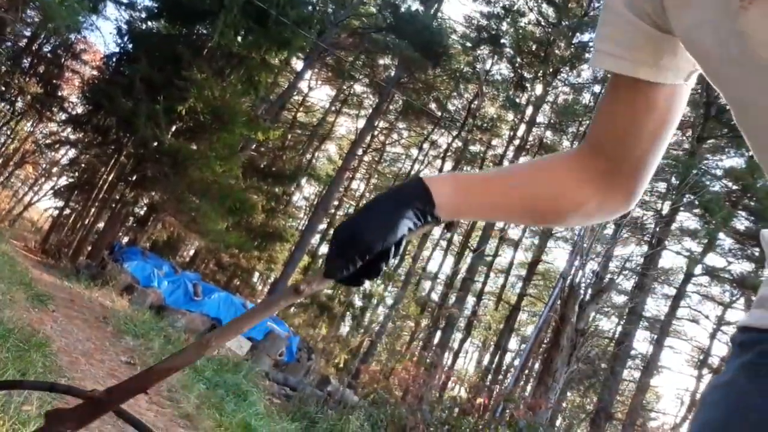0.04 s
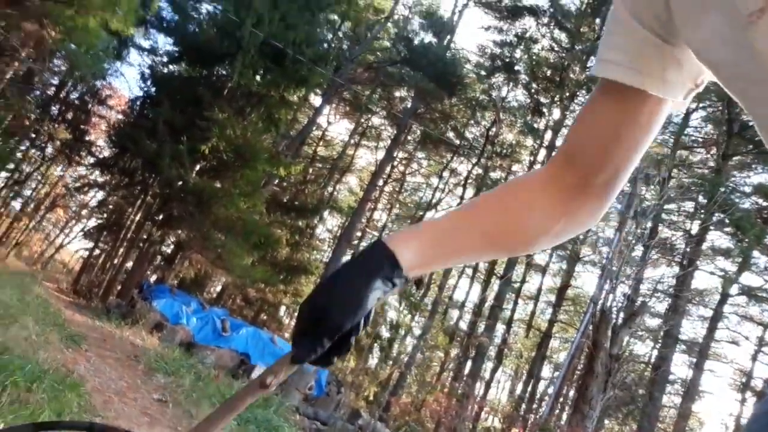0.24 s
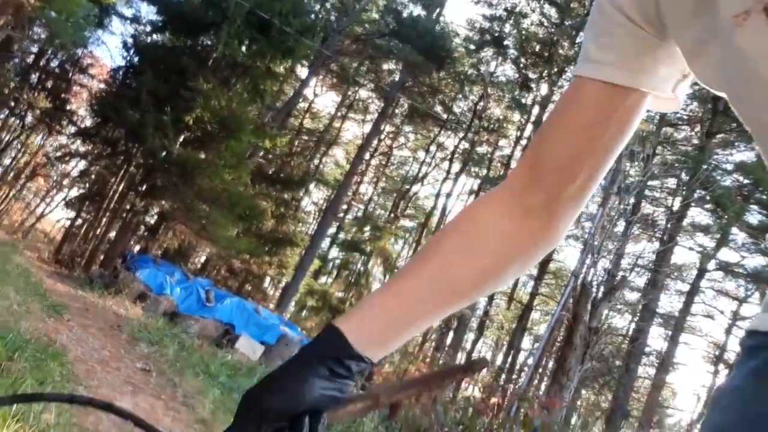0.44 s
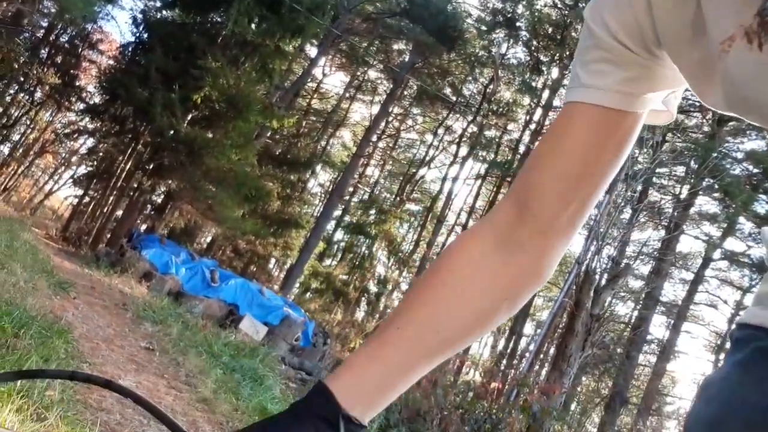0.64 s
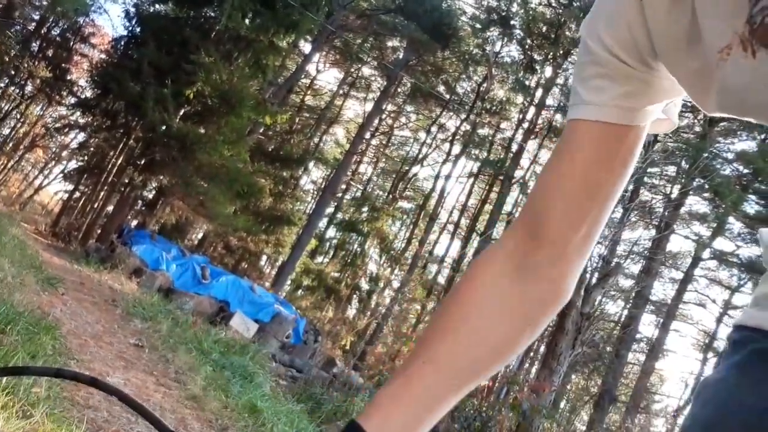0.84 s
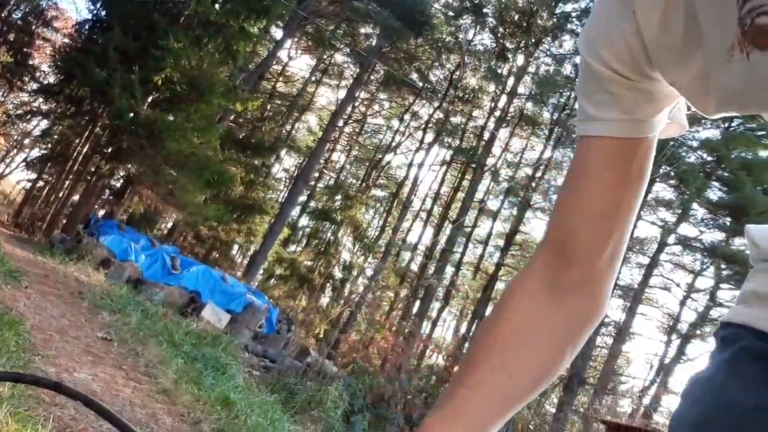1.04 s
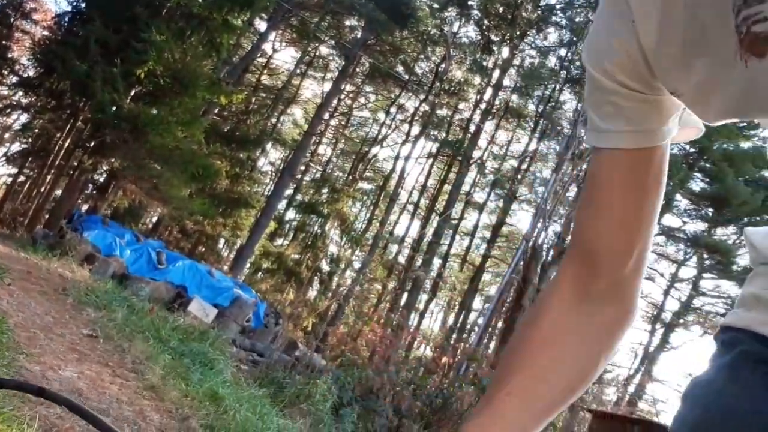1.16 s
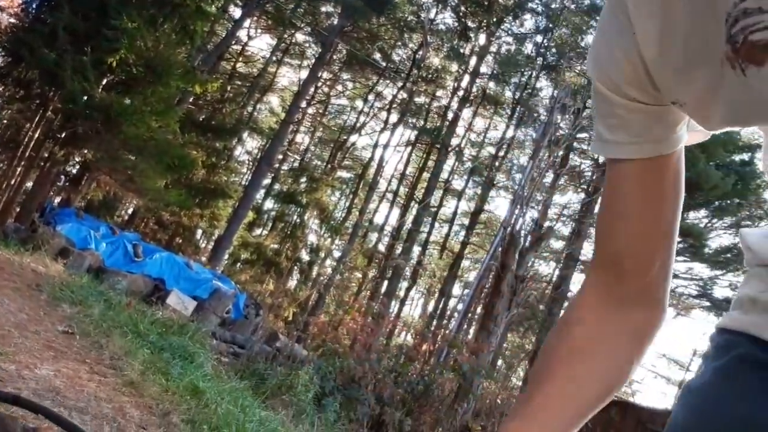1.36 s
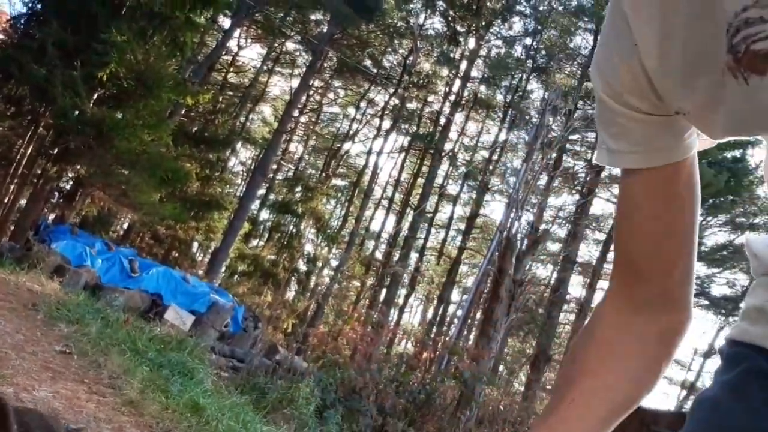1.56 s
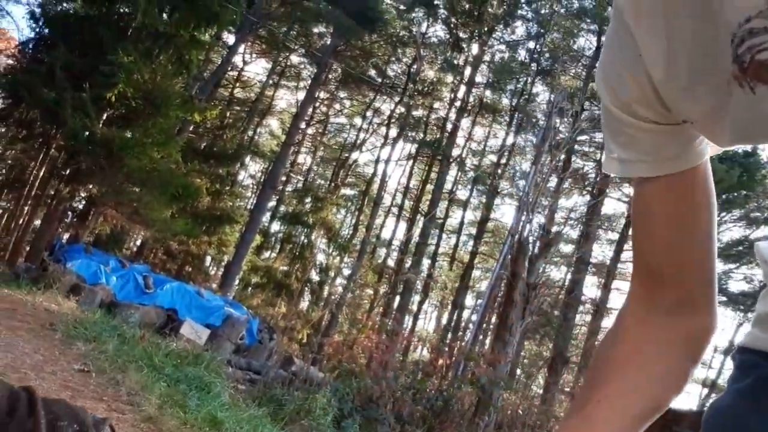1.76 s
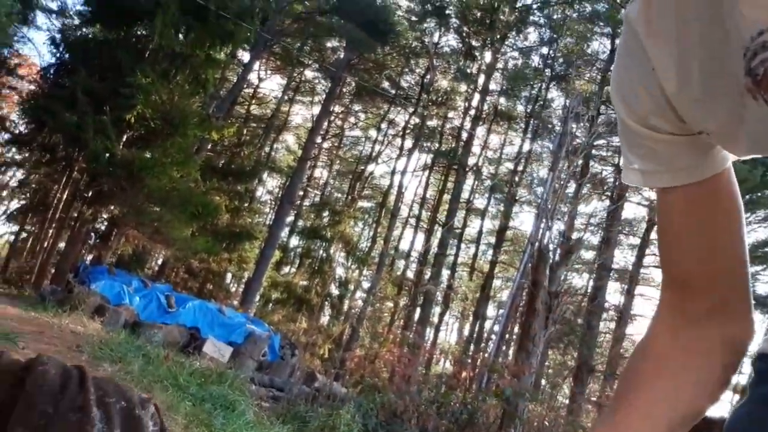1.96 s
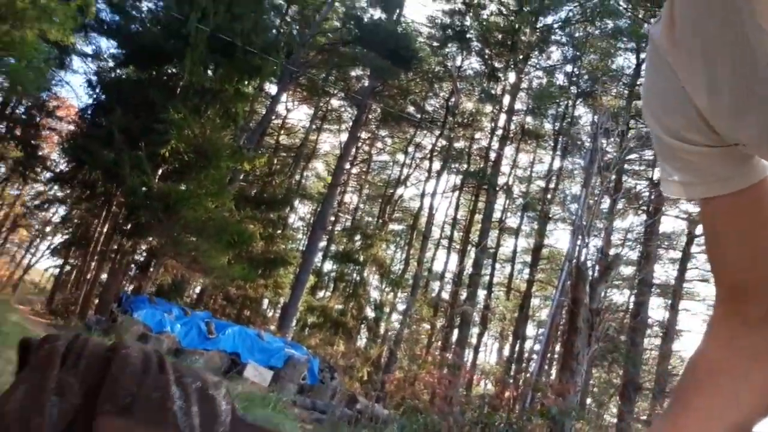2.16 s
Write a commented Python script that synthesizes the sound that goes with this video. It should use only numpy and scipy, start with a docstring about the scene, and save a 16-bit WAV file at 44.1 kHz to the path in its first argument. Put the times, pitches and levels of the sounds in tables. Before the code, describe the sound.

Drips patter into a pot from soaked fabric, with dull thumps and wind on the microphone.

```python
"""A dull bump and the hollow swish of a stick along a dye pot, as soaked fabric is worked and lifted out.
Drops ping on the liquid and excite the pot's modes; the wet cloth slumps and sloshes, and runoff fizzes.
Low thumps and turbulent puffs of air reach the microphone. Behind them, at the edge of a wood,
far insects trill and a bird whistles thinly over a quiet hush."""
import sys
import numpy as np
from scipy import signal
from scipy.fft import rfft, irfft
from scipy.io import wavfile
from scipy.ndimage import uniform_filter1d

SR = 44100
rng = np.random.default_rng(int(sys.argv[2]) if len(sys.argv) > 2 else 0)


def dump(signal):
    """Clip the signal to [-1, 1] and save it as 16-bit WAV at the path in sys.argv[1]."""
    limited = np.clip(np.atleast_2d(signal).T, -1, 1)
    pcm = np.round(limited * 32767).astype(np.int16)
    wavfile.write(sys.argv[1], SR, pcm)


N = 96755
T = np.arange(N) / SR

# Spectrum of water draining from cloth. Each row: frequency in Hz, relative density in dB.
WATER_SPECTRUM = [(300, -8.5), (600, 1), (1200, -9), (1700, -1.5), (2450, 5.5), (3200, -1.5), (4200, 3),
                  (6500, -5), (9000, -2.5), (12000, -1.5), (16000, -12.5)]


def from_db(db):
    """Amplitude grows tenfold for every 20 dB."""
    return 10 ** (np.asarray(db) / 20)


def rms_one(x):
    """Division by the RMS value gives unit power."""
    return x / np.sqrt(np.mean(x ** 2) + 1e-20)


def level(rows):
    """A gain envelope, linear in dB between points of time and level."""
    return from_db(np.interp(T, *np.transpose(rows)))


def coloured(x, spectrum):
    """Filtering by multiplication of spectra, scaled to unit power."""
    hz, db = np.transpose(spectrum)
    f = np.maximum(np.fft.rfftfreq(N, 1 / SR), 1)
    gain = from_db(np.interp(np.log(f), np.log(hz), db))
    return rms_one(irfft(rfft(x) * gain, N))


def noise(spectrum):
    """White noise takes on the spectrum of its filter; unit power."""
    return coloured(rng.standard_normal(N), spectrum)


def wander(rate):
    """Noise low-passed at the rate in Hz is a random drift of unit spread."""
    return noise([(1, 0), (rate, 0), (4 * rate, -40), (40 * rate, -120)])


def resonant_noise(hz, q):
    """Two passes through one resonance select a band of noise; unit power."""
    b, a = signal.iirpeak(min(hz, SR / 3), max(q, .5), fs=SR)
    return rms_one(signal.lfilter(b, a, signal.lfilter(b, a, rng.standard_normal(N))))


def evened(x, size):
    """Division by the running RMS over size samples holds the power steady."""
    return x / np.sqrt(uniform_filter1d(x ** 2, size=size) + 1e-9)


def since(onset):
    """Seconds elapsed since an onset, zero before it."""
    return np.maximum(T - onset, 0)


def dying(onset, t60):
    """Exponential decay from a sudden onset, by 60 dB in t60 seconds."""
    return (T >= onset) * np.exp(-np.minimum(np.log(1000) * since(onset) / t60, 50))


def swell(t, rise):
    """A critically damped pulse, peaking at 1 at the rise time."""
    u = np.minimum(t / rise, 50)
    return u * np.exp(1 - u)


def hush():
    """Stationary broadband noise, strongest in the bass, forms the outdoor background."""
    # Spectrum of the hush. Each row: frequency in Hz, relative density in dB.
    spectrum = [(25, 1), (60, 21), (130, 8), (200, 9.5), (300, -6), (500, -7.5), (800, -11.5), (1400, -13),
                (2200, -10.5), (3100, -27.5), (4500, -10), (6200, -10.5), (9200, -14), (12000, -13),
                (16000, -13.5)]
    return from_db(-65.5) * noise(spectrum)


def insect_chorus():
    """Amplitude modulation of narrow noise bands is heard as the throb of far insects."""
    # Insect bands. Each row: centre in Hz, quality factor, level in dB, throbs per second.
    bands = [(3956, 8.7, -76.5, 44), (7590, 19, -80.5, 32), (8960, 8, -78, 32)]
    out = np.zeros(N)
    for hz, q, db, throb_hz in bands:
        throb = 1 + 0.63 * np.sin(2 * np.pi * throb_hz * T + wander(rate=2.8))
        out += from_db(db) * throb * resonant_noise(hz, q)
    return out


def bird():
    """A far bird's whistle is a pure tone gliding in frequency, here along a parabola."""
    # Whistles. Each row: start and length in seconds, level in dB, first, middle and last pitch in Hz.
    whistles = [(.14, 0.077, -71, 7600, 8100, 8300), (1.617, 0.13, -69.5, 8160, 8380, 7400)]
    out = np.zeros(N)
    for onset, length, db, *pitches in whistles:
        progress = np.minimum(since(onset) / length, 1)
        hz = np.polyval(np.polyfit([0, .5, 1], pitches, deg=2), progress)
        out += from_db(db) * np.sin(np.pi * progress) * np.sin(2 * np.pi * np.cumsum(hz) / SR)
    return out


def insect_trill():
    """A nearly periodic train of falling chirps fuses into a trill."""
    # Envelope of the trill. Each row: time in seconds, level in dB.
    envelope = [(.55, -65.5), (.7, -60), (.85, -65), (1.1, -77.5), (1.6, -96), (1.95, -70), (2.19, -59.5)]
    chirps_per_s, jitter, duty = 44, .05, 0.49
    top_hz, fall_hz, waver_hz, waver_db = 4326, 802, 80, 1.2
    cycles = np.cumsum(chirps_per_s * (1 + jitter * wander(rate=8))) / SR
    progress = np.minimum(cycles % 1 / duty, 1)
    hz = top_hz - fall_hz * progress + waver_hz * wander(rate=28)
    chirps = np.sin(np.pi * progress) * np.sin(2 * np.pi * np.cumsum(hz) / SR)
    return level(envelope) * chirps * from_db(waver_db * wander(rate=16))


def buffeting():
    """Turbulent pressure on the microphone port rumbles; harder puffs reach higher in frequency."""
    # Envelope of the puffs. Each row: time in seconds, level in dB.
    envelope = [(0, -47.5), (.02, -48), (.04, -59), (.12, -62.5), (.3, -55.5), (.41, -56.5), (.437, -48),
                (.48, -60.5), (.57, -61), (.595, -61), (.612, -36), (.635, -45.5), (.655, -42.5),
                (.68, -33.5), (.697, -30.5), (.72, -40.5), (.74, -33), (.78, -39), (.795, -58),
                (.815, -45.5), (.88, -59), (.96, -58.5), (.985, -51.5), (1.03, -62.5), (1.65, -59.5),
                (1.95, -59.5), (1.98, -45), (2.015, -50.5), (2.05, -50.5), (2.1, -60.5), (2.16, -44.5),
                (2.19, -43)]
    # Spectrum of the turbulence. Each row: frequency in Hz, relative density in dB.
    spectrum = [(20, -68), (40, -2.5), (60, 7.5), (125, 2), (180, -8), (260, -20.5), (400, -25.5),
                (800, -50)]
    strong_puff_db, edge_db, edge_exponent = -22, -36.5, 1.426
    force = level(envelope)
    low_pass = signal.butter(4, 376, "low", fs=SR, output="sos")
    rumble = signal.sosfilt(low_pass, evened(noise(spectrum), size=900))
    edge_gain = from_db(edge_db) * (force / from_db(strong_puff_db)) ** edge_exponent
    return force * rumble + edge_gain * evened(resonant_noise(hz=185, q=1.97), size=900)


def thumps():
    """A heavily damped low oscillation, sagging in pitch, is heard as a dull thump."""
    # Thumps. Each row: start in seconds, peak in dB, first and final pitch in Hz, rise in seconds.
    pulses = [(.001, -33, 71.5, 62.6, 0.0088), (.2156, -16, 298, 71.5, 0.003),
              (.673, -21.5, 165, 91.3, 0.0058), (0.701, -27.5, 230, 97.3, 0.0045),
              (.748, -34, 271, 108, 0.0075), (1.978, -31.5, 86, 67.6, 0.01)]
    sag_s, sharpness = 0.0059, 1.9
    out = np.zeros(N)
    for onset, db, start_hz, end_hz, rise in pulses:
        t = since(onset)
        hz = (end_hz + (start_hz - end_hz) * np.exp(-t / sag_s)) * (t > 0)
        out -= from_db(db) * swell(t, rise) ** sharpness * np.sin(2 * np.pi * np.cumsum(hz) / SR)
    return out


def scrape():
    """Sliding friction of the stick on the pot wall makes a hollow swish that fades and stops."""
    # Spectrum of the friction noise. Each row: frequency in Hz, relative density in dB.
    spectrum = [(200, -4.5), (420, -9.5), (660, -2.5), (1120, -14.5), (1780, 2.5), (2400, -8.5),
                (3000, -27), (3750, -7.5), (4800, -15.5), (5600, -13.5), (7000, -20.5), (8200, -17.5),
                (12000, -25), (16000, -26)]
    start_db, fade_db_per_s, release_at_s, release_s = -54, 59, 0.42, 0.15
    release = np.clip(1 - since(release_at_s) / release_s, 0, 1)
    return from_db(start_db - fade_db_per_s * T) * release * noise(spectrum)


def runoff():
    """Tiny droplets of uneven size arrive at random, adding shot noise to a smooth fizz."""
    # Envelope of the trickle. Each row: time in seconds, level in dB.
    envelope = [(.12, -105), (.2, -59.5), (.33, -72.5), (.365, -54), (.415, -63.5), (.475, -56.5),
                (.52, -66), (.565, -65.5), (.9, -73), (1.0, -67), (1.15, -70), (1.33, -65), (1.43, -68.5),
                (1.48, -65.5), (1.63, -59), (1.7, -70), (1.9, -78), (1.98, -68.5), (2.04, -63.5),
                (2.19, -61.5)]
    droplets_per_s, spread_db, over_fizz_db = 790, 3, 0.5
    sizes = from_db(spread_db * np.minimum(rng.exponential(1, N), 5)) * rng.choice([-1, 1], N)
    arrivals = rng.random(N) < droplets_per_s / SR
    droplets = coloured(sizes * arrivals, WATER_SPECTRUM)
    return level(envelope) * rms_one(noise(WATER_SPECTRUM) + from_db(over_fizz_db) * droplets)


def slumps():
    """Wet cloth settles with a slosh: noise in a broad resonance, decaying with a little wet hiss."""
    # Sloshes. Each row: start in seconds, level in dB, rise and T60 in seconds, centre in Hz.
    sloshes = [(0.193, -46, 0.0061, 0.12, 430), (0.261, -57, 0.013, 0.12, 724),
               (0.351, -58, 0.0035, 0.19, 680), (.578, -45.5, 0.0036, 0.11, 352),
               (0.581, -63, 0.0037, 0.4, 800), (1.574, -59.5, 0.0076, 0.34, 730),
               (1.619, -56.5, 0.017, 0.14, 630), (1.66, -69.5, 0.014, 0.76, 613)]
    hiss = from_db(-20.5) * noise(WATER_SPECTRUM)
    out = np.zeros(N)
    for onset, db, rise, t60, hz in sloshes:
        attack = np.minimum(since(onset) / rise, 1)
        decay = np.where(T < onset + rise, 1, dying(onset + rise, t60))
        hollow = evened(resonant_noise(hz, q=1.35), size=500)
        out += from_db(db) * attack * decay * (hollow + hiss)
    return out


def pot_ring(knocks):
    """The pot's impulse response, a sum of damped modes, is convolved with the knocks."""
    # Modes of the pot and its air. Each row: frequency in Hz, relative level in dB, T60 in seconds.
    modes = [(758, -7.5, 0.046), (696, -34, 0.095), (860, -5.5, 0.0066), (1120, -4.5, 0.0084),
             (1194, -19, 0.035), (1855, -22.5, 0.067), (2076, -14.5, 0.01)]
    response = sum(from_db(db) * dying(0, t60) * np.sin(2 * np.pi * hz * T) for hz, db, t60 in modes)
    high_pass = signal.butter(2, 550, "high", fs=SR, output="sos")
    return signal.fftconvolve(knocks, signal.sosfilt(high_pass, response))[:N]


def drips():
    """Each drop's impact gives a damped ping, a crack of spray and an impulse to the pot's modes."""
    # Drops. Each row: start in seconds, ping peak in dB, pitch in Hz, rise in cycles,
    # relative spray level in dB, knock on the pot in dB.
    drops = [(.179, -49, 14500, 4.8, -44, -79), (0.1824, -42, 11240, 4.5, -45, -78),
             (0.1836, -35.5, 4070, 1.4, -36, -76), (0.1963, -30.5, 8480, 3.5, -30.5, -45),
             (.202, -43, 9100, 4, -42, -43.5), (.208, -49, 6850, 2, -46, -67),
             (0.215, -38, 3720, 1.3, -47, -45.5), (.227, -34.5, 4130, 0.45, -66, -46.5),
             (.2393, -23.5, 4600, 0.45, -33, -28), (0.241, -38, 1240, 0.46, -59, -59),
             (0.2918, -43, 9800, 1.1, -42.5, -61), (0.3008, -46, 9100, 5.1, -45, -77),
             (0.3146, -50.5, 4400, 3.7, -72, -62.5), (0.3253, -40, 3260, 0.5, -66, -83),
             (.3505, -49, 1356, 3.5, -56, -44), (.354, -43, 1820, 1.25, -62, -41.5),
             (0.3619, -29.5, 4230, 0.71, -36.5, -46.5), (0.4775, -26.5, 4170, 1.4, -51, -75),
             (0.847, -52, 4870, 1.5, -56, -76), (.8615, -50.5, 8940, 1.8, -57, -80),
             (0.917, -56.5, 2080, 1.8, -69, -83), (0.9406, -47, 4870, 1.6, -73, -85),
             (.9685, -50.5, 3940, 2.8, -53, -76), (0.996, -48, 4270, 2, -49, -75),
             (1.0536, -47.5, 12700, 3.3, -52, -87), (1.096, -42, 9500, 0.71, -65, -78),
             (1.133, -49.5, 2200, 1.36, -49, -80), (1.197, -44.5, 5030, 1, -49, -96),
             (1.215, -48.5, 2760, 3.9, -53, -82), (1.244, -48, 4100, 1.9, -51, -80),
             (1.257, -48, 3440, 1.1, -70, -88), (1.3818, -49, 5600, 3, -55, -87),
             (1.4582, -46.5, 6620, 2.3, -47.5, -94), (1.5208, -44.5, 4400, 4.1, -49, -80),
             (1.53, -55.5, 1380, 5.7, -47, -67), (1.56, -50.5, 1290, 2.1, -48, -50.5),
             (1.5805, -58, 740, 0.78, -70, -80), (1.5971, -39.5, 2470, 2.3, -33.5, -56),
             (1.597, -39, 2840, 1.1, -48, -80), (1.6155, -65, 4400, 1.8, -57, -49),
             (1.637, -54, 630, 1.2, -55, -80), (1.6694, -55.5, 2230, 1.9, -48, -69),
             (1.692, -60, 2200, 3.6, -66, -76), (1.7508, -47, 6340, 2.3, -56, -66),
             (1.756, -51.5, 5800, 4, -49.5, -87), (2.014, -40, 10300, 2, -45, -78),
             (2.054, -54, 2640, 3, -62, -78), (2.053, -46, 4560, 4, -53, -83),
             (2.0966, -49.5, 3370, 2.1, -45, -80)]
    # Spectrum of the spray. Each row: frequency in Hz, relative density in dB.
    spray_spectrum = [(500, -32), (1200, -8), (2100, 19), (3000, -9), (4200, 1), (5400, 5), (6800, 2),
                      (8800, 12), (11500, 7.5), (16000, -9.5)]
    spray_t60_s, mist_t60_s, mist_db = .009, 0.25, -26
    pings, spray_power, knocks = np.zeros(N), np.zeros(N), np.zeros(N)
    t = T[:SR // 10]
    for onset, ping_db, hz, rise_cycles, spray_db, knock_db in drops:
        start = int(onset * SR)
        ping = from_db(ping_db) * swell(t, rise_cycles / hz) * np.sin(2 * np.pi * hz * t)
        pings[start:start + len(t)] += ping[:N - start]
        burst = dying(onset, spray_t60_s) + from_db(mist_db) * dying(onset, mist_t60_s)
        spray_power += (from_db(spray_db) * burst) ** 2  # incoherent sources add in power
        knocks[start] += from_db(knock_db)
    spray = np.sqrt(spray_power) * evened(noise(spray_spectrum), size=40) / 2
    return pings + spray + pot_ring(knocks)


def scene():
    """The near sources and the wood behind them add by superposition in one channel."""
    near = scrape() + drips() + thumps() + slumps() + runoff() + buffeting()
    wood = insect_trill() + hush() + insect_chorus() + bird()
    return (near + wood)[None]


def record(dry):
    """Band limiting rolls off the deepest bass gently and cuts the top steeply."""
    low_cut_hz, stopband_hz = 14, 16700
    x = signal.sosfilt(signal.butter(1, low_cut_hz, "high", fs=SR, output="sos"), dry)
    return signal.sosfilt(signal.cheby2(16, 60, stopband_hz, fs=SR, output="sos"), x)


dry = scene()
out = record(dry)
dump(out)
```